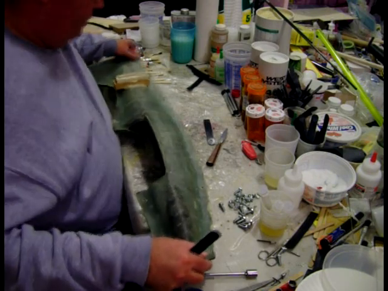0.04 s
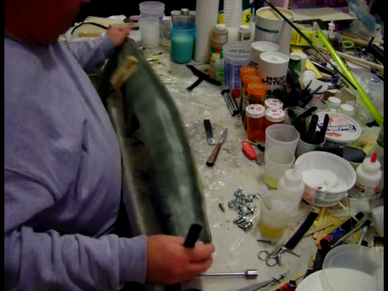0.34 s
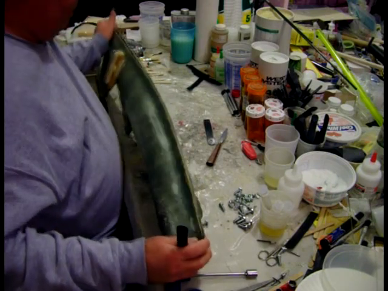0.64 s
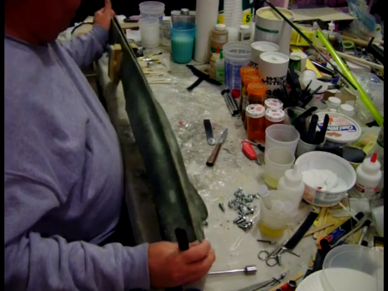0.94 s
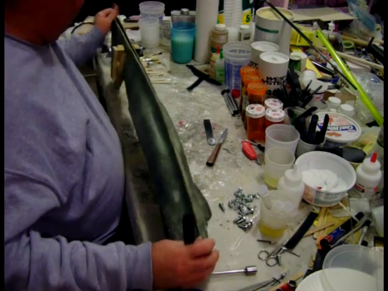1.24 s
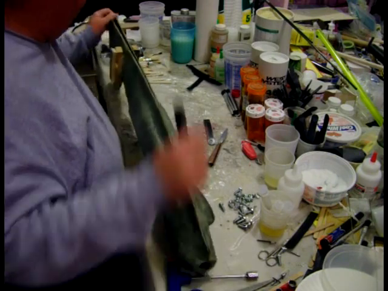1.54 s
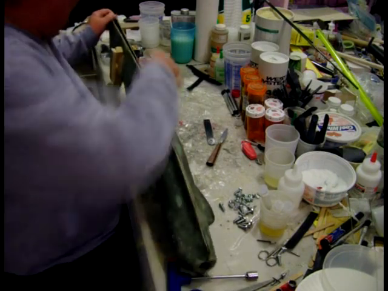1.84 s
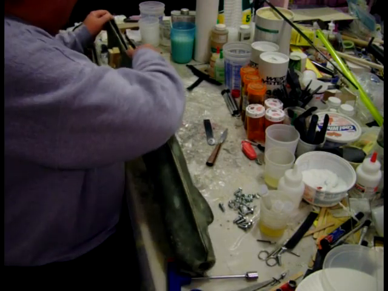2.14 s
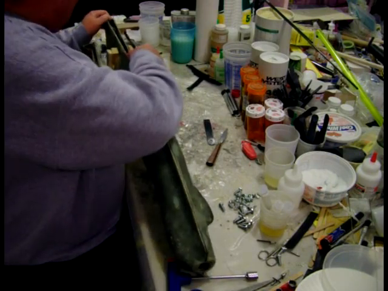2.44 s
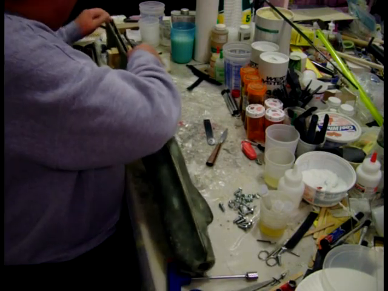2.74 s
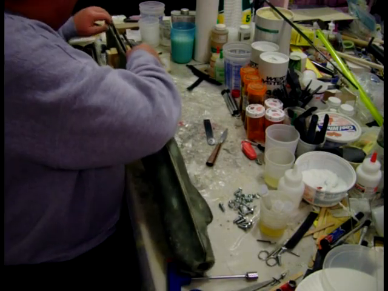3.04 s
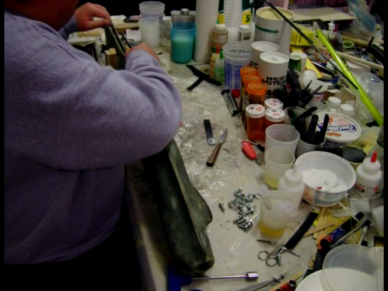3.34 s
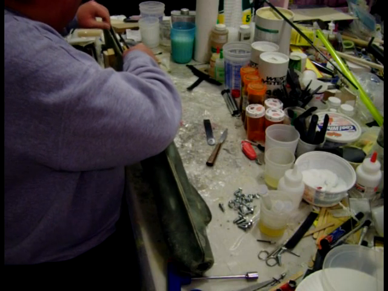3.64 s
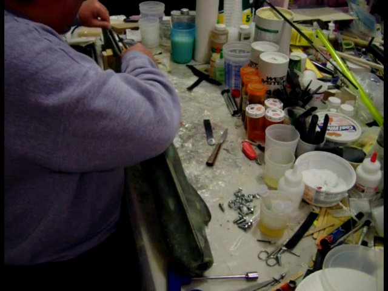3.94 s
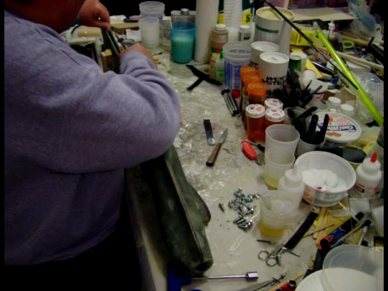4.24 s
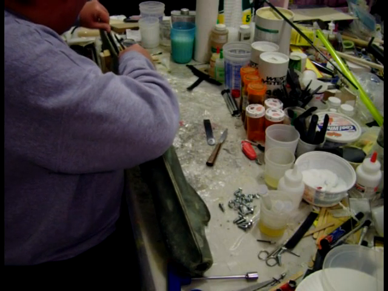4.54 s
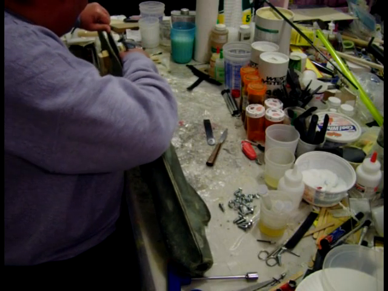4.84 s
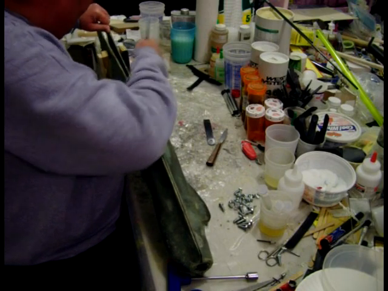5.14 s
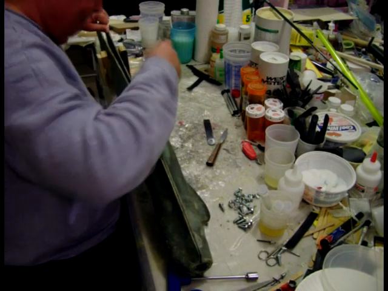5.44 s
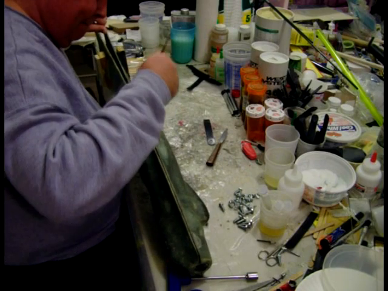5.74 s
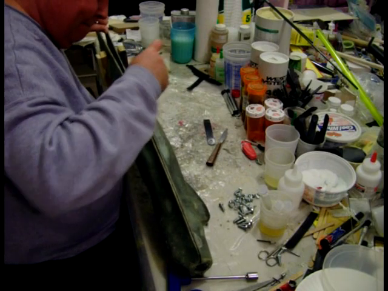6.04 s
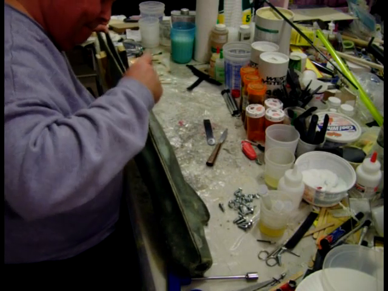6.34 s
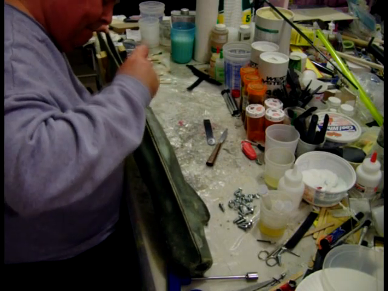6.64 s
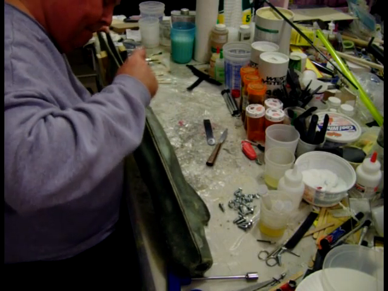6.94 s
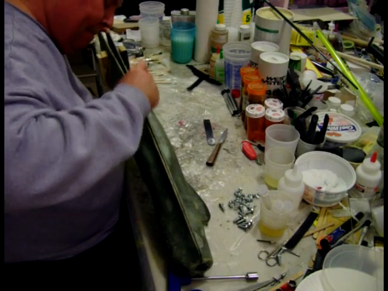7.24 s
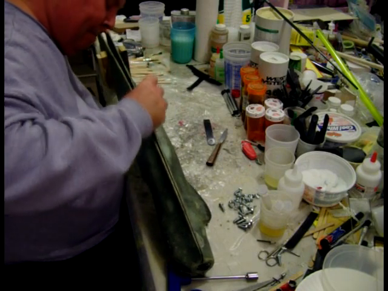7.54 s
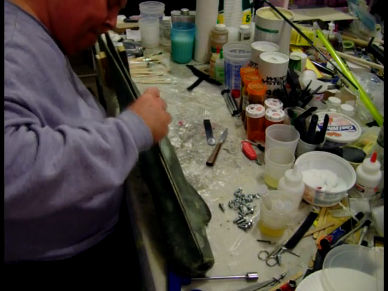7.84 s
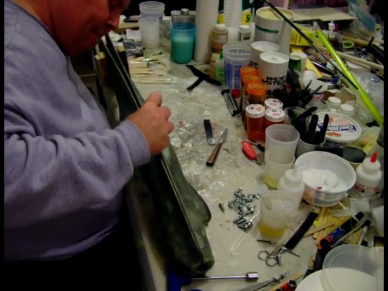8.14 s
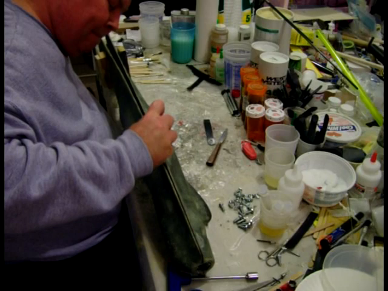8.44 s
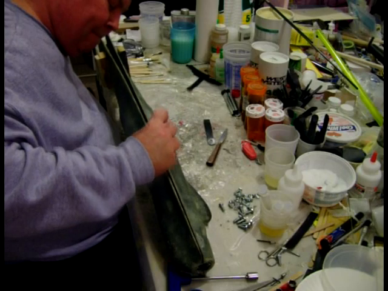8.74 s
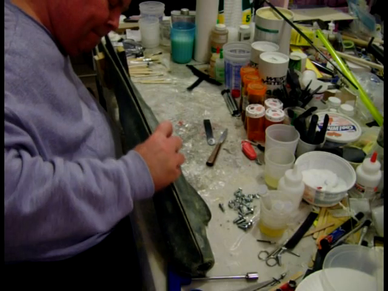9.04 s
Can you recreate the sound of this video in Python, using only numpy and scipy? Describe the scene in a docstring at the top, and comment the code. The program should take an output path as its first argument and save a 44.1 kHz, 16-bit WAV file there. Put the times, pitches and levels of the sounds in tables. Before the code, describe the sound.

Hollow knocks and a scrape as a fiberglass shell is pried from its mold, then light ticks and two sharp cracks over a low hum.

```python
"""A long fiberglass shell is worked loose from its mold on a workshop bench: it knocks, ticks, flexes
and scrapes, then lets go with sharp cracks. Each contact is a noise burst that rings the hollow shell
and booms the bench. A sleeve brushes along the shell, ventilation hums, and the small room answers the
blows. The loudest blows make the recorder's gain control thump and duck."""
import sys
import numpy as np
from scipy import signal
from scipy.fft import rfft, irfft, next_fast_len
from scipy.io import wavfile
from scipy.ndimage import uniform_filter1d, map_coordinates

SR = 44100
rng = np.random.default_rng(int(sys.argv[2]) if len(sys.argv) > 2 else 0)


def dump_mix(stems):
    """Bounce the given channels to the path in sys.argv[1] as a 16-bit WAV at rate SR."""
    frames = np.atleast_2d(stems).T  # one column per channel
    limited = np.clip(frames, -1, 1)  # hard clip at full scale
    pcm = np.round(limited * 32767).astype(np.int16)
    wavfile.write(sys.argv[1], SR, pcm)


N = 400428
T = np.arange(N) / SR
# reverb time of the workshop: (frequency [Hz], t60 [s])
ROOM_DECAY = [(120, 0.53), (800, 0.49), (3000, 0.43)]


def knocks():
    """The shell strikes its mold with a hard click; the heavy blows graze it just before they land."""
    # (time [s], level [dB], bass [dB], snap [dB], contact length [s], shell note [Hz], echo [dB],
    #  boom [dB], bench note [Hz], click peak [dB]); bass, snap, echo and boom are relative to the level
    hits = [(.255, -3.5, -3, -26.5, .013, 683, -11.5, -8, 293, -28),
            (0.3522, -14, 1.5, -24, 0.011, 986, -4.5, -5, 277, -44),
            (0.716, -16, -5.5, -24, 0.02, 895, -3, -22, 345, -34),
            (0.748, -19, -8, -21, 0.055, 1150, -12, -17.5, 345, -43),
            (0.929, -20.5, -5.5, -24, .014, 427, -8, -11, 349, -32),
            (0.9418, -4.5, -2.5, -18, 0.017, 593, -3, -13.5, 255, -13),
            (1.377, -27.5, 2.5, -21, .036, 608, -1.5, -2.5, 123.5, -39),
            (1.406, -5, -3.5, -17.5, 0.013, 952, -2.5, -8, 112, -11)]
    track = np.zeros(N)
    for s, db, bass_db, snap_db, length, ring_hz, echo_db, boom_db, boom_hz, click_db in hits:
        add(track, s, blow(db, length, ring_hz, bass_db, snap_db, echo_db, boom_db, boom_hz))
        add(track, s, amp(click_db) * resin_click())
    return track


def cracks():
    """The bond tears with a rising rasp, then lets go in two bright snaps; shell and freed rim ring on."""
    # (time [s], level [dB], gap between snaps [s], shell note [Hz], tear length [s],
    #  boom re level [dB], bench note [Hz], rim note [Hz])
    breaks = [(8.5314, -11.5, .0085, 1170, 0.01, -15, 252, 2090),
              (8.9574, -11, .006, 935, 0.0019, -24, 95, 2980)]
    # high modes of the thin rim: (frequency [Hz], level [dB], t60 [s])
    rim_modes = [(1500, 3.5, 0.63), (1780, 1, 0.54), (2010, 6.5, 0.38), (2145, -4, .33), (2300, -0.5, 0.65),
                 (2690, -1.5, .3), (3070, -2, 0.3), (3411, -4, 0.65), (3700, -4.5, .4)]
    track, t = np.zeros(N), T[:SR // 20]
    for s, db, gap, ring_hz, tear, boom_db, boom_hz, rim_hz in breaks:
        rasp = splinter(t / tear * (t < tear))
        add(track, s - tear, amp(db - 15) * rasp)
        add(track, s, amp(db) * resin_click())
        for start, level_db in [(s, db), (s + gap, db + 0.5)]:
            snap = blow(level_db, length=0.0062, ring_hz=ring_hz, bass_db=-24.5, snap_db=0.5,
                        echo_db=-11, boom_db=boom_db, boom_hz=boom_hz, ring_db=-4)
            add(track, start, snap)
        hollow = shell_ring(ring_hz=500, snap_db=-22, room_db=-3)  # the shell springs free
        add(track, s + gap, amp(db - 12) * hollow)
        rim = modes(rim_modes, nearness(rim_modes, rim_hz, octaves=0.4), rise=0.0036, shift=0.0016)
        add(track, s, amp(db - 17.5) * rim)
    return track


def ticks():
    """Prying fingers tick on the rim, light and dry, each ringing the shell at another place."""
    # (time [s], level [dB], snap re level [dB], contact length [s], shell note [Hz])
    taps = [(1.8162, -22.5, -16.5, 0.01, 1100), (2.448, -29.5, -13, 0.0086, 1040),
            (2.646, -28, -9, 0.0066, 1260), (2.714, -32, -21, 0.0087, 990), (2.946, -34, -10, 0.018, 1000),
            (3.249, -36.5, -14, 0.018, 1060), (3.679, -24, -23, 0.0038, 1100),
            (3.789, -31, -14, 0.006, 1100), (4.012, -38, -19, 0.018, 950), (4.255, -35, -17, .007, 910),
            (4.45, -37, -3, 0.013, 1220), (5.347, -28, -20, 0.0073, 690), (6.237, -34.5, -20, 0.01, 744)]
    track = np.zeros(N)
    for s, db, snap_db, length, ring_hz in taps:
        tick = blow(db, length, ring_hz, bass_db=-12.5, snap_db=snap_db,
                    echo_db=-16.5, boom_db=-17.5, ring_db=-3)
        add(track, s, tick)
    return track


def bumps():
    """The flexing shell gives way softly with a short, hollow note and almost no snap."""
    # (time [s], level [dB], contact length [s], ring re level [dB], shell note [Hz], boom re level [dB])
    flexes = [(3.438, -32, 0.013, 1.5, 700, -5), (3.473, -39, .013, 9, 520, -6),
              (6.661, -27, 0.0034, 5.5, 268, -0.5), (7.497, -24, 0.0096, 11, 450, -3),
              (7.595, -38, 0.0095, 10, 480, -9), (7.626, -29.5, 0.0074, 1, 610, -9),
              (7.7192, -13.5, 0.0062, 6, 490, -8), (8.198, -31, .04, 4.5, 281, 0),
              (8.744, -30, 0.034, -2.5, 480, -20)]
    track = np.zeros(N)
    for s, db, length, ring_db, ring_hz, boom_db in flexes:
        bump = blow(db, length, ring_hz, bass_db=0.5, snap_db=-22,
                    echo_db=-5.5, boom_db=boom_db, ring_db=ring_db)
        add(track, s, bump)
    return track


def blow(db, length, ring_hz, bass_db, snap_db, echo_db, boom_db, boom_hz=280, ring_db=-3.5):
    """One contact: its noise, the shell's ring and a bench boom whose note depends on where it lands."""
    # low modes of the bench and the hollow mold on it: (frequency [Hz], level [dB], t60 [s])
    bench_modes = [(96.9, -3.5, 0.47), (129, -2, 0.33), (184.7, -7.5, 0.13), (251.2, 3.5, 0.23),
                   (279.3, -2.5, 0.31), (349, 0.5, .2)]
    weight = nearness(bench_modes, boom_hz, octaves=0.32) + amp(-15)
    boom = amp(boom_db) * modes(bench_modes, weight, rise=0.0024)
    shell = amp(ring_db) * shell_ring(ring_hz, snap_db)
    return amp(db) * (contact_noise(bass_db, snap_db, length, echo_db) + shell + boom)


def shell_ring(ring_hz, snap_db, room_db=-10, wall_s=0.026, wall_db=-13):
    """Modes near ring_hz ring most, a harder snap reaches the higher ones, and a near wall slaps back."""
    # modes of shell and mold: (frequency [Hz], level [dB], t60 [s])
    shell_modes = [(251, -5, 0.031), (379.3, -6, 0.41), (453.7, 9, 0.037), (491.2, 8.5, 0.075),
                   (643, 1.5, 0.097), (731.5, 10.5, 0.043), (794.4, 8.5, 0.058), (990, 4.5, 0.048),
                   (1208, -1, 0.067), (1298, -0.5, 0.051), (1470, -16.5, 0.11), (2050, -19.5, 0.07),
                   (2430, -10.5, 0.16), (2510, -10, 0.075)]
    hz = np.array(shell_modes)[:, :1]
    favoured = nearness(shell_modes, ring_hz, octaves=0.28)
    tilt_db_per_octave = 0.42 * (snap_db + 9)
    others = amp(-17 + tilt_db_per_octave * np.maximum(np.log2(hz / 650), 0))
    ring = band(modes(shell_modes, favoured + others, rise=0.0015), 3400, "low", order=4)
    echo = amp(room_db) * room(ring)
    add(echo, wall_s, amp(wall_db) * ring)
    return ring + echo


def contact_noise(bass_db, snap_db, length, echo_db, rise_s=0.0022, build_s=0.011):
    """A short noise burst in three bands (bass, body, snap), each with its diffuse echo."""
    # tone of the contact: (frequency [Hz], level [dB])
    colour = [(50, -9), (95, 8.5), (190, 5.5), (260, 6), (550, 3.5), (1000, 5.5), (1300, 2), (1700, -13),
              (2400, -9), (3400, -16.5), (4300, -26.5), (5200, -33), (6200, -51.5), (8000, -65),
              (10000, -97.5)]
    # (low edge [Hz], high edge [Hz], level [dB], time stretch [ratio])
    bands = [(60.4, 380, bass_db, 0.82), (397, 1860, 0.011, 0.79), (1670, 10000, snap_db + 0.5, 0.89)]
    t = T[:SR * 3 // 4]
    out = np.zeros(len(t))
    for lo_hz, hi_hz, db, stretch in bands:
        direct, echo = (unit(band(noise(colour, len(t)), [lo_hz, hi_hz], "band", order=5))
                        for _ in range(2))
        burst = (1 - np.exp(-(t / (rise_s * stretch)) ** 2)) * np.exp(-(t / (length * stretch)) ** 2)
        direct *= np.linalg.norm(burst) / np.linalg.norm(direct * burst)  # the envelope sets the energy
        tail = (1 - np.exp(-t / build_s)) * fade(t, along(ROOM_DECAY, np.sqrt(lo_hz * hi_hz)))
        out += amp(db) * (direct * burst + amp(echo_db) * echo * tail)
    return out


def resin_click(t60=0.0012):
    """The sharp click of hard resin at the first instant of contact."""
    return splinter(fade(T[:SR // 20], t60))


def splinter(envelope, band_hz=(900, 3300), top_hz=5400):
    """Hard, bright grit under a very short envelope, peak 1."""
    grit = band(envelope * rng.standard_normal(len(envelope)), band_hz, "band", order=2)
    grit = band(grit, top_hz, "low", order=8)
    return grit / np.abs(grit).max()


def rubbing(slips_per_s=5000, grit_db=-2, room_db=-9, sing_db=5, sing_width_hz=35, release_t60=0.31):
    """The shell slides on the mold: tiny irregular slips shake it, most at a note set by the grip."""
    # (time [s], rise [s], time to release [s], level [dB], singing note [Hz])
    strokes = [(0, 0.0066, .057, -33.5, 384), (0.085, 0.021, 0.027, -26.5, 480),
               (0.516, 0.054, 0.25, -19, 386), (2.63, 0.0048, 0.026, -33, 298),
               (2.72, 0.0089, 0.018, -33, 298), (2.948, 0.018, 0.025, -34, 506),
               (3.423, 0.015, 0.027, -29.5, 490), (4.195, .018, 0.035, -34.5, 437),
               (4.433, 0.0073, .024, -39, 390), (6.195, .02, 0.12, -39, 760),
               (6.722, 0.011, 0.022, -30.5, 387), (7.09, 0.023, 0.078, -25, 238),
               (7.306, 0.0075, 0.12, -27, 470), (7.561, .015, .032, -28, 480),
               (7.835, .02, 0.22, -36.5, 378), (8.187, 0.012, 0.031, -22.5, 280),
               (8.734, 0.0085, 0.016, -35, 263)]
    # tone of the scrape: (frequency [Hz], level [dB])
    colour = [(60, -39), (135, -0.5), (180, -17.5), (255, 4), (310, -10), (390, -2), (570, -5.5),
              (800, -4.5), (1250, -10), (1750, -28.5), (2500, -30.5), (3400, -32), (5000, -44.5),
              (7000, -71), (9500, -120)]
    t, track = T[:SR], np.zeros(N)
    for s, rise, length, db, ring_hz in strokes:
        effort = (1 - np.exp(-(t / rise) ** 2)) * fade(np.maximum(t - length, 0), release_t60)
        slips = (rng.random(SR) < slips_per_s / SR) * rng.standard_normal(SR)
        friction = unit(slips) + amp(grit_db) * rng.standard_normal(SR)
        response = lambda hz: amp(along(colour, hz) + sing_db * bell(hz, ring_hz, sing_width_hz))
        add(track, s, amp(db) * effort * unit(filtered(friction, response)))
    return track + amp(room_db) * room(track)


def brushing():
    """Sleeve and fingers brush the shell: dry swishes that rise fast and trail off."""
    # (time [s], length [s], peak level [dB])
    swishes = [(0.0, 0.072, -46), (0.156, 0.19, -50), (4.24, 0.017, -45), (7.785, 0.016, -30),
               (8.198, 0.085, -42), (8.386, 0.02, -49)]
    swell = np.zeros(N)
    for s, length, db in swishes:
        progress = T[:SR] / (length / 2)  # 1 at the peak
        add(swell, s, amp(db) * progress * np.exp(1 - progress))
    # tone of the cloth: (frequency [Hz], level [dB])
    colour = [(300, 3.5), (1200, -0.5), (1800, -0.5), (2800, 7), (4200, -1), (5500, -10),
              (7000, -49), (10000, -94)]
    return swell * noise(colour, N) * amp(wobble(110))


def gain_thumps(rise_s=0.0013, drift_t60=0.49, overshoot_t60=2.4):
    """The recorder's gain control thumps on the loudest blows: a sub-bass offset jumps and drifts back."""
    # (time [s], level [dB], polarity [+1 or -1], overshoot [share])
    offsets = [(0.26, -10.5, 1, 0.37), (0.943, -10, 1, 0.31), (1.407, -9, 1, 0.13), (7.724, -8, -1, 0.035),
               (8.537, -18.5, 1, 0.46), (8.962, -12, 1, .25)]
    track, t = np.zeros(N), T[:2 * SR]
    jump = 1 - np.exp(-(t / rise_s) ** 2)
    for s, db, polarity, overshoot in offsets:
        drift = (1 + overshoot) * fade(t, drift_t60) - overshoot * fade(t, overshoot_t60)
        add(track, s, np.sign(polarity) * amp(db) * jump * drift)
    return track


def ventilation(air_db=-32, hiss_db=-46.7):
    """A steady rush of air and a faint hiss around the fan's low, blurred drone."""
    # tone of the air's rumble and of the hiss: (frequency [Hz], level [dB])
    air_colour = [(12, -17.5), (25, 13.5), (42, 5.5), (62, 3), (90, 5), (170, 3.5), (250, 0), (320, -2),
                  (380, 0), (520, -5), (1000, -6.5), (1280, -7), (1650, -19.5), (2800, -60.5)]
    hiss_colour = [(900, -3.5), (1300, 8), (1700, 2), (2400, 2), (3000, -1.5), (3900, -2), (5200, -14),
                   (6300, -30.5), (7500, -45), (10000, -100)]
    # drone of the fan: (frequency [Hz], width [Hz], level [dB])
    fan_notes = [(98.1, 8.7, -48.5), (150.1, 11, -42.5)]
    air = amp(air_db) * unit(band(noise(air_colour, N), 1500, "low", order=4))
    drone = sum(amp(db) * unit(filtered(rng.standard_normal(N), lambda f: bell(f, hz, width)))
                for hz, width, db in fan_notes)
    return air + drone + amp(hiss_db) * noise(hiss_colour, N)


def room(x, build_s=0.02):
    """A fresh diffuse tail of the workshop, building up over the first reflections."""
    hz, t, spectrum = signal.stft(rng.standard_normal(SR // 2), SR, nperseg=256)
    decay = fade(t, along(ROOM_DECAY, hz)[:, None])
    _, tail = signal.istft(spectrum * decay, SR, nperseg=256)
    tail *= 1 - np.exp(-(T[:len(tail)] / build_s) ** 2)
    return signal.fftconvolve(x, tail / np.linalg.norm(tail))[:len(x)]


def modes(table, weight, rise, shift=0.0089):
    """Decaying modes, rms 1 at the start; the grip changes, so they shift a little from blow to blow."""
    t = T[:SR * 3 // 4]
    hz, db, t60 = np.transpose(table)[:, :, None]
    detune, scatter_db = rng.standard_normal((2,) + hz.shape)
    phase = 2 * np.pi * (hz * (1 + shift * detune) * t + rng.random(hz.shape))
    partials = weight * amp(db + scatter_db) * np.sin(phase) * fade(t, t60)
    ring = partials.sum(axis=0) * (1 - np.exp(-t / rise))
    return ring / np.std(ring[:SR // 60])


def nearness(table, hz, octaves):
    """Weight of each mode: 1 at the favoured pitch, less further away."""
    return np.exp(-(np.log2(np.array(table)[:, :1] / hz) / octaves) ** 2)


def bell(hz, centre_hz, width_hz):
    """A resonance peak of height 1."""
    return 1 / (1 + (2 * (hz - centre_hz) / width_hz) ** 2)


def amp(db):
    """Decibels to gain."""
    return 10 ** (np.asarray(db) / 20)


def unit(x):
    """Scaled to rms 1."""
    return x / np.sqrt(np.mean(x ** 2) + 1e-20)


def along(points, hz):
    """(frequency [Hz], value) points read on a log axis."""
    freqs, values = np.transpose(points)
    return np.interp(np.log(hz + 1), np.log(freqs), values)


def filtered(x, response):
    """Zero-phase EQ; response gives the gain at each frequency."""
    size = next_fast_len(len(x) + 8192)
    return irfft(rfft(x, size) * response(np.fft.rfftfreq(size, 1 / SR)), size)[:len(x)]


def noise(spectrum, size):
    """Coloured noise of rms 1."""
    return unit(filtered(rng.standard_normal(size), lambda hz: amp(along(spectrum, hz))))


def band(x, hz, kind, order):
    """Causal Butterworth filter."""
    return signal.sosfilt(signal.butter(order, hz, kind, fs=SR, output="sos"), x)


def fade(t, t60):
    """Exponential decay, 60 dB in t60."""
    return np.exp(-np.log(1000) * t / t60)


def wobble(rate):
    """A smooth random curve, rate knots a second."""
    return map_coordinates(rng.standard_normal(int(N * rate / SR) + 4), [T * rate])


def add(track, s, sound):
    """Mix a sound into the track at time s."""
    part = track[max(round(s * SR), 0):][:len(sound)]
    part += sound[:len(part)]


def scene():
    """All layers, mixed to mono."""
    shell = knocks() + ticks() + bumps() + cracks() + rubbing()
    return (shell + brushing() + gain_thumps() + ventilation())[None]


def record(dry, threshold_db=-16, slope=0.31, release_db_per_s=7, attack_s=0.0022, top_hz=15800):
    """Gain control ducks fast and recovers slowly; the highest peaks clip and the top treble is cut."""
    x = dry[0]
    level_db = 10 * np.log10(np.abs(uniform_filter1d(x ** 2, SR // 250)) + 1e-9)
    excess_db = slope * np.maximum(level_db - threshold_db, 0)
    held_db = np.maximum.accumulate(excess_db + release_db_per_s * T) - release_db_per_s * T
    duck_db = band(held_db, 1 / (np.pi * attack_s), "low", order=2)
    ducked = x * amp(-duck_db)
    clipped = ducked / (1 + ducked ** 20) ** (1 / 20)
    return filtered(clipped, lambda hz: hz < top_hz)[None]


dry = scene()
out = record(dry)
dump_mix(out)
```